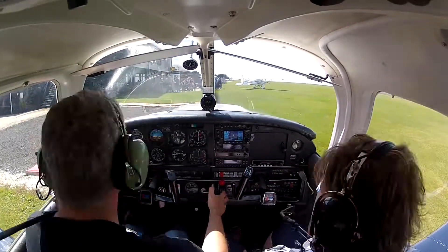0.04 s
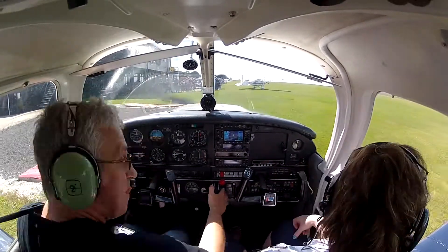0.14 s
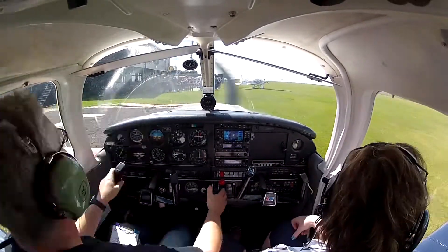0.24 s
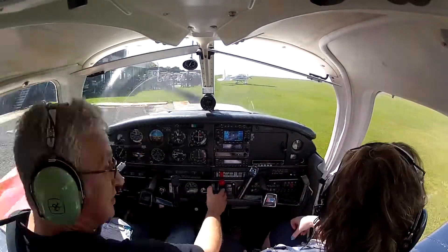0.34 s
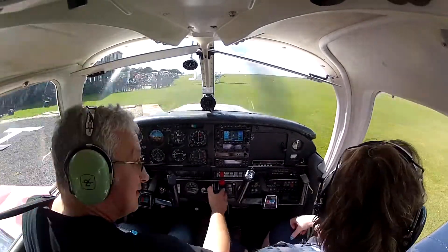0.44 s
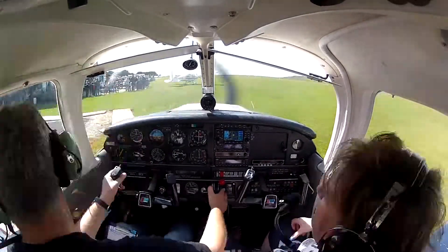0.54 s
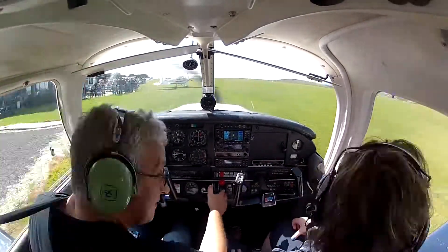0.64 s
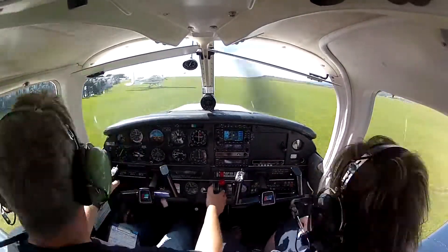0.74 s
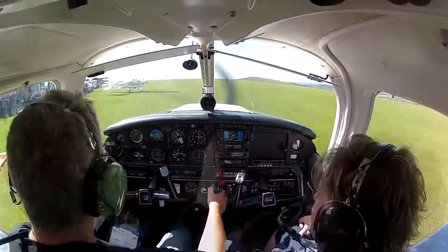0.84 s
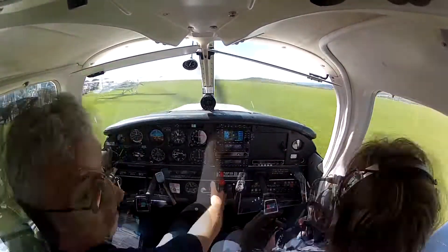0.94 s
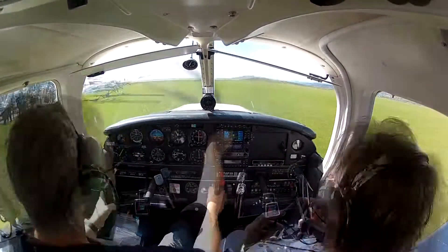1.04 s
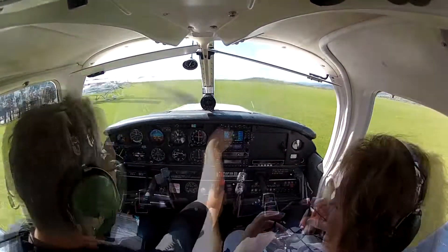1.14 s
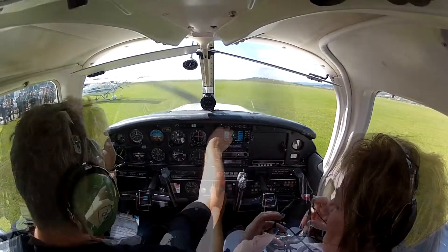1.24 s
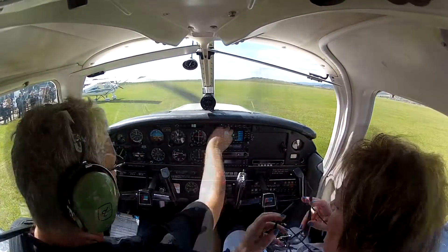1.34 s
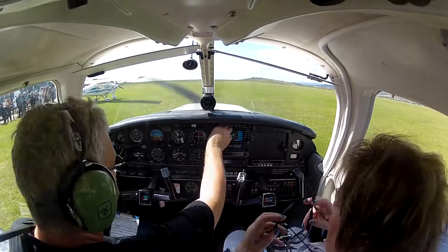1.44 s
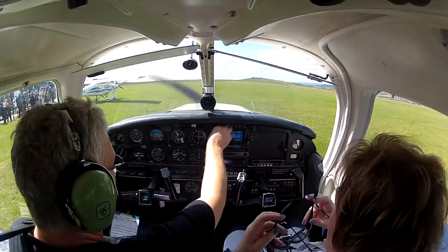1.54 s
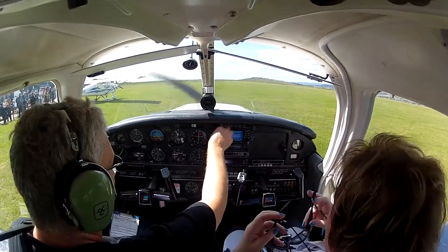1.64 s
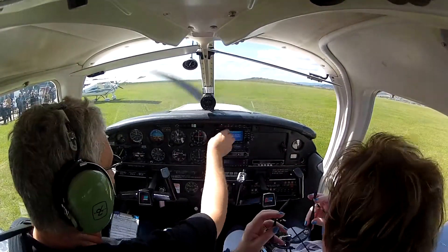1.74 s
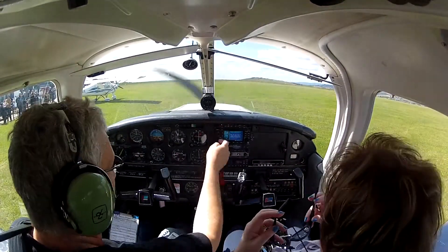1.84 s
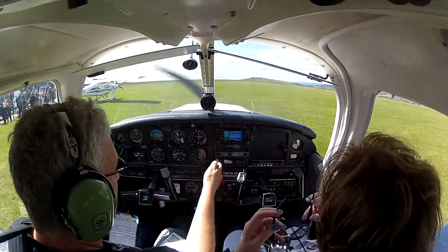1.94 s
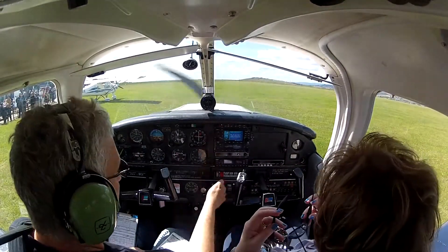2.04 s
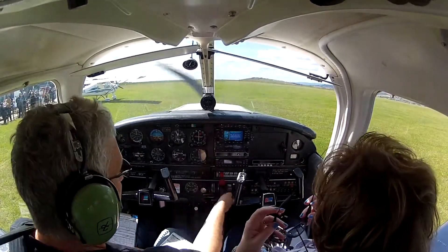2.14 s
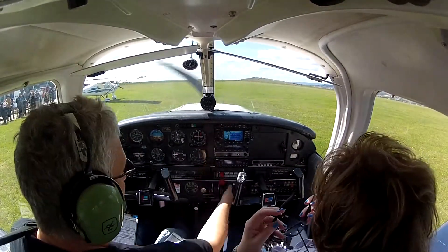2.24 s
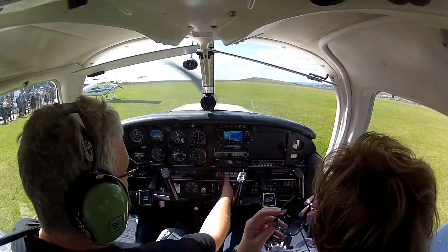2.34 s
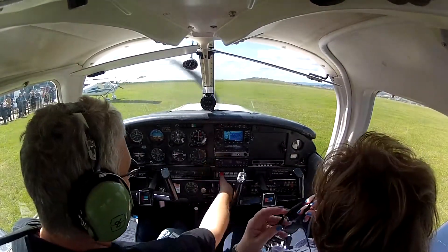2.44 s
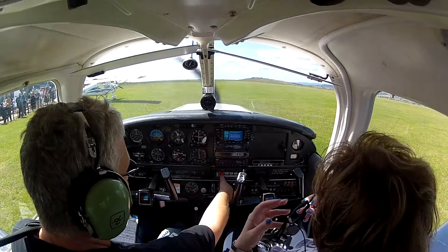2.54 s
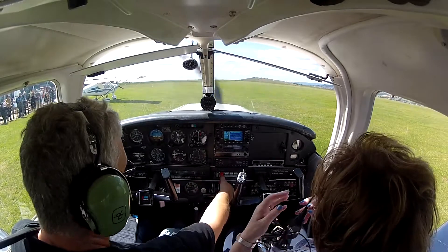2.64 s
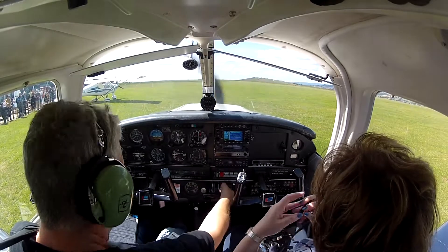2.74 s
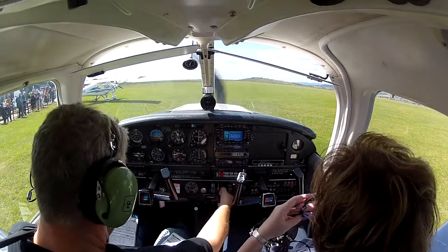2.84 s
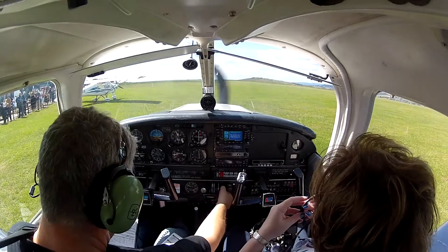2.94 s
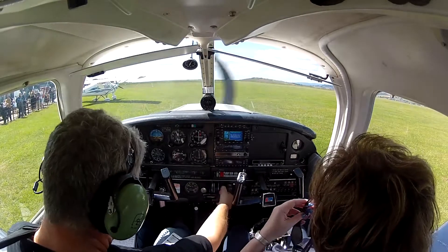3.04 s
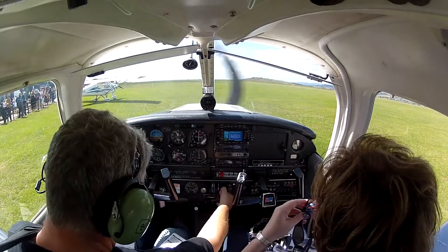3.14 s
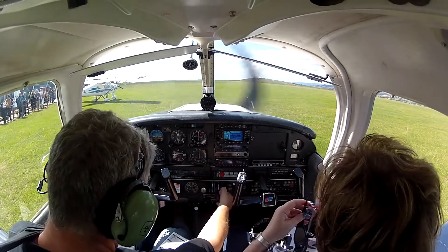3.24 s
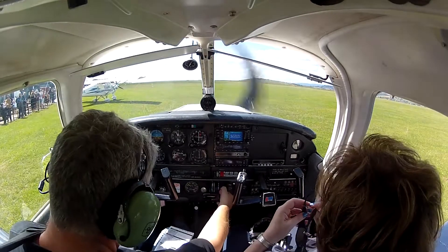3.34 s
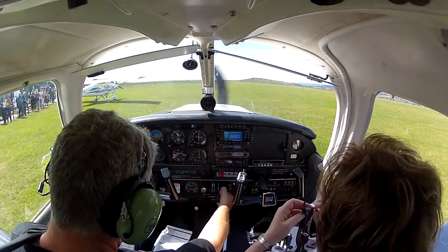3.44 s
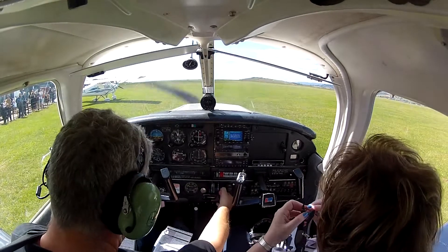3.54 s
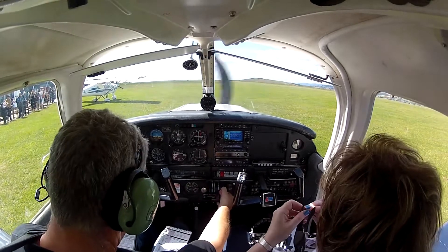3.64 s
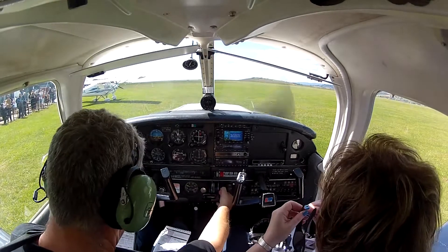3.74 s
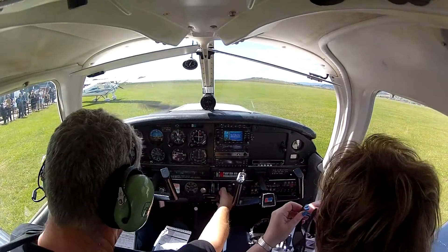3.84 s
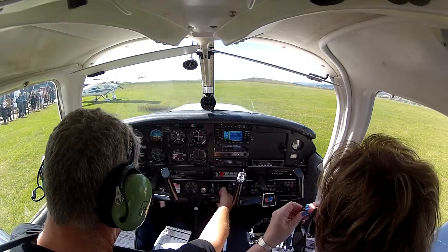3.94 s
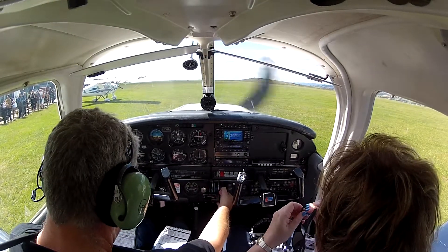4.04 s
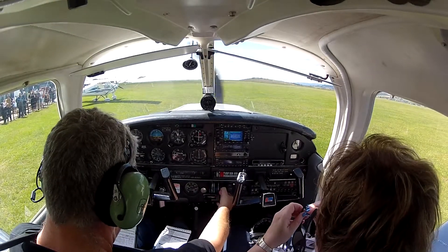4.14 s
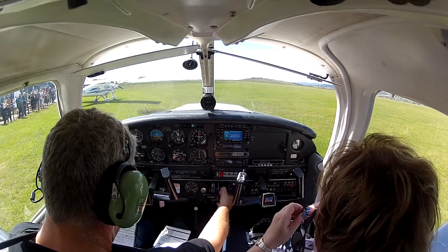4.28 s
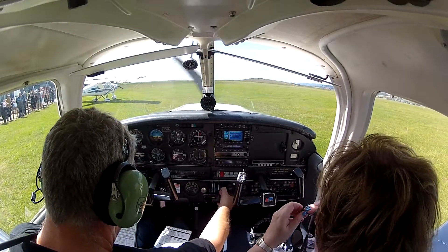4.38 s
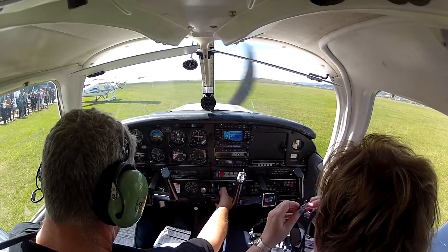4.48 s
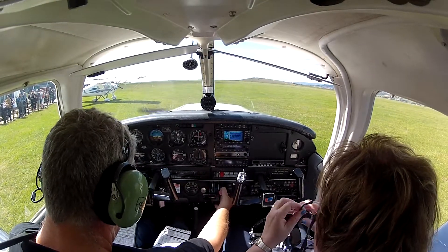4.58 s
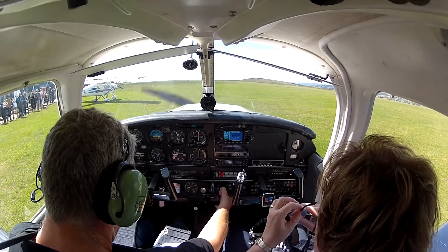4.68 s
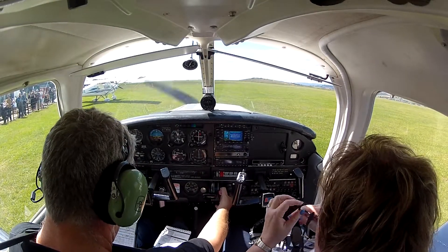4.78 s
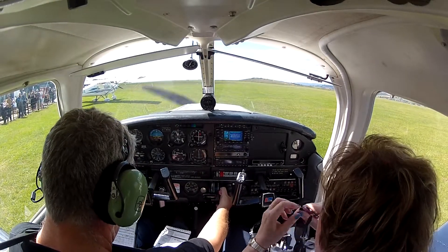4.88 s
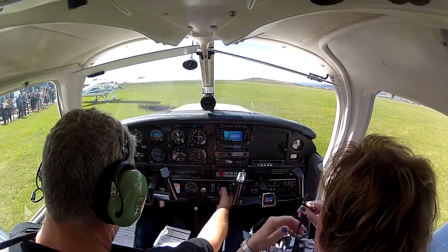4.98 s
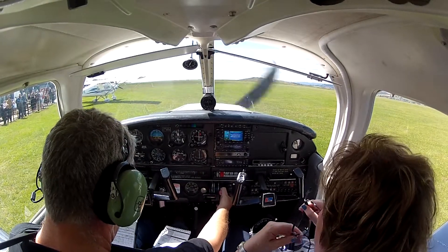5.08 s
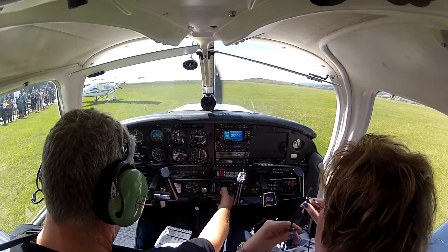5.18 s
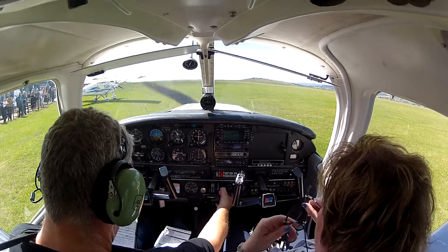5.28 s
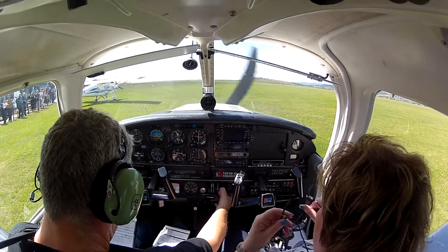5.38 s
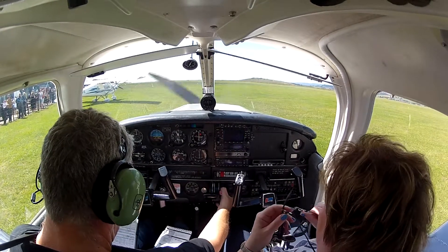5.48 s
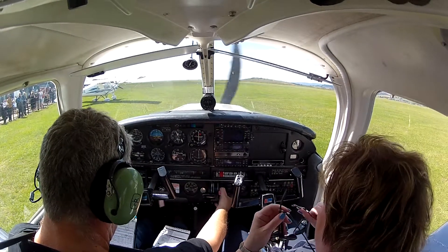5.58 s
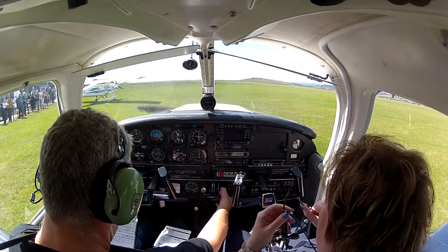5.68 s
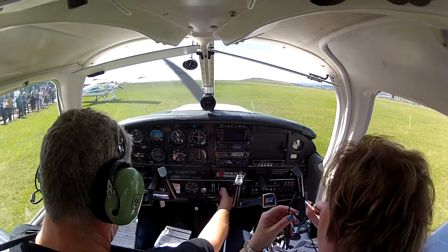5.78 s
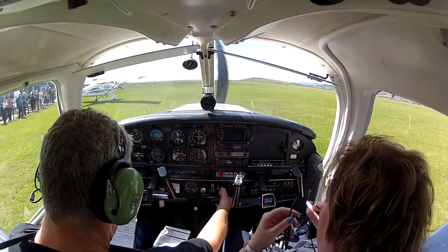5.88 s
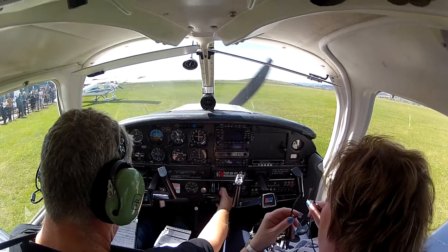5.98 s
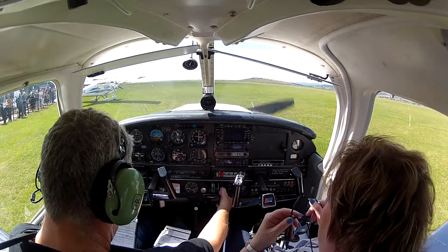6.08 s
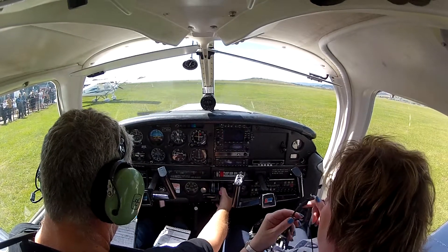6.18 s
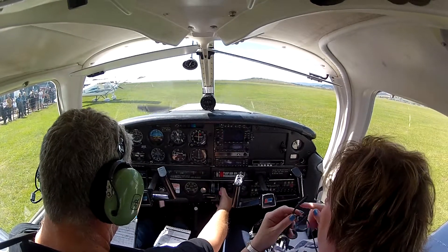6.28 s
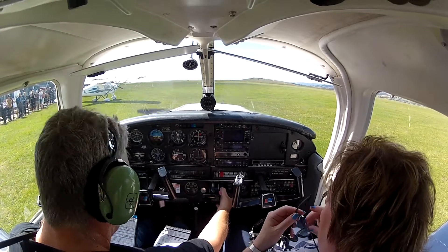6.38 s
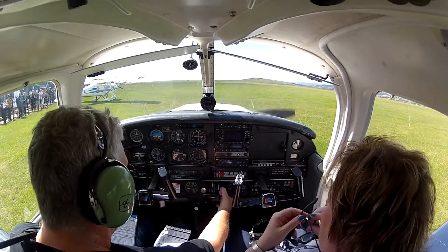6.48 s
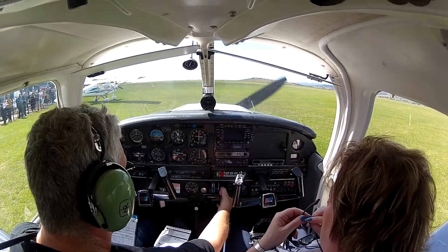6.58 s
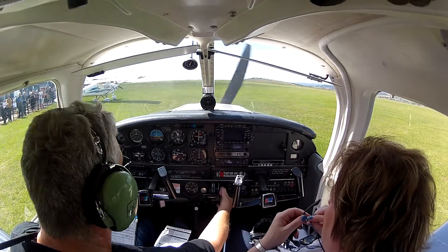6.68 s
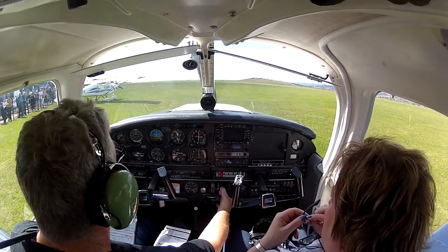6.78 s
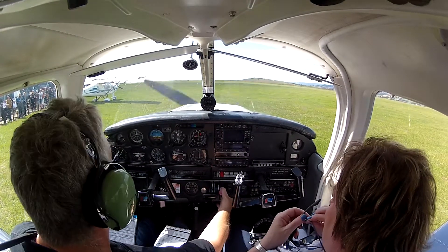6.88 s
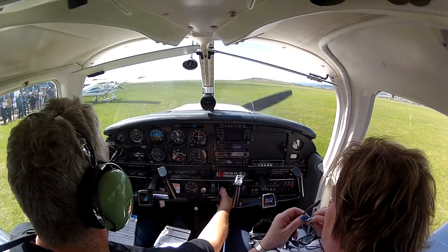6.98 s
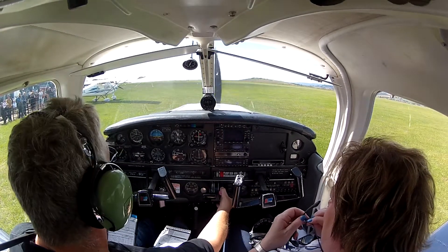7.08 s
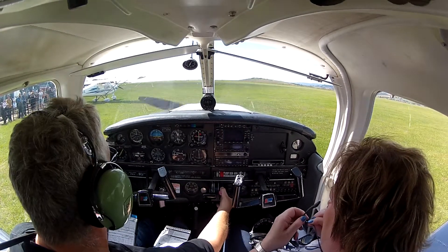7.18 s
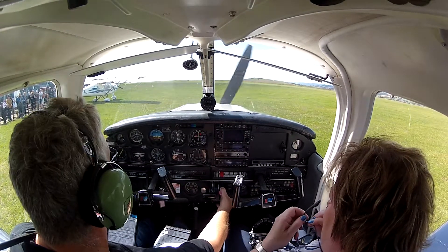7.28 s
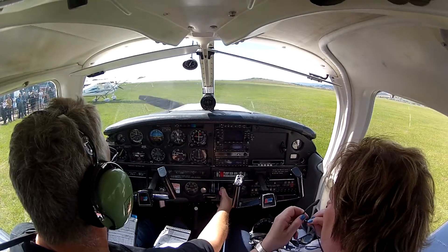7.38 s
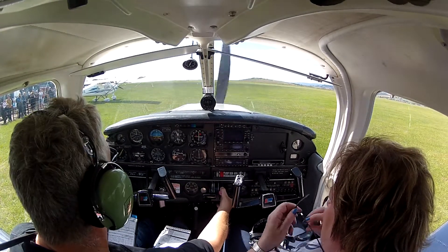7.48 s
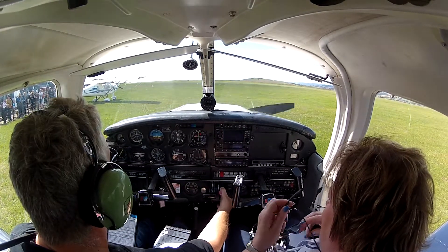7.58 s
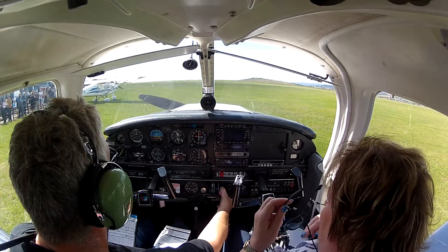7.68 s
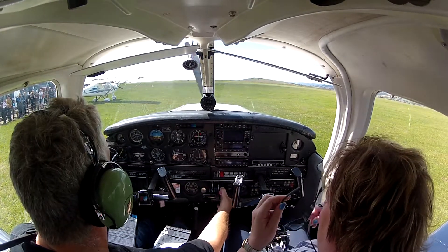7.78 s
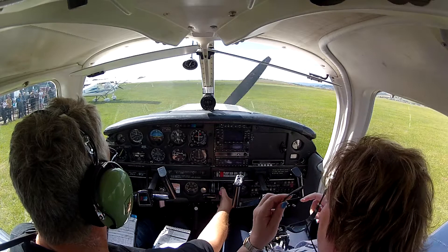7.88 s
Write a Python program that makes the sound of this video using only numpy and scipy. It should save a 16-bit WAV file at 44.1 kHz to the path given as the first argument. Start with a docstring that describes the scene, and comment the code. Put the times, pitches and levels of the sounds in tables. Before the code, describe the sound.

A small propeller plane's piston engine fades in at idle, heard close from inside the cabin as a low, throbbing drone with mechanical clatter. After a few light clicks it cuts out and winds down, falling in pitch and puffing. A shudder rattles loose cabin fittings, then the last turns come as separate, slowing clacks. A faint, high instrument whine and hiss carry on underneath.

```python
"""Light aircraft engine shutting down

Inside the cabin, on a camera's microphone. The sound fades in on a four-cylinder engine at idle, then
the fuel is cut. The engine runs down, shudders on its mounts so that the cabin rattles, and clacks
through its last compressions. The instrument gyros whine on. The camera holds each sample at a low
rate, which mirrors the sound into the treble."""
import sys
import numpy as np
from scipy import signal
from scipy.fft import rfft, irfft, next_fast_len
from scipy.io import wavfile
from scipy.ndimage import map_coordinates

SR = 44100
rng = np.random.default_rng(int(sys.argv[2]) if len(sys.argv) > 2 else 0)


def wav_out(sig):
    """Save sig, one row per channel (or a flat mono array), as 16-bit PCM at SR to the path in sys.argv[1]."""
    wavfile.write(sys.argv[1], SR, np.round(np.clip(np.atleast_2d(sig).T, -1, 1) * 32767).astype(np.int16))


N = 349139
FUEL_CUT_S = 3.37

# Relative strength of each of the four cylinders; each engine noise scales it to its own dB.
CYLINDERS = [-0.44,0.037,0.8,0.22]
# Tone of the loose fittings around the cabin. Each row: frequency in Hz, gain in dB.
FITTINGS = [(500,4),(1400,-2),(2200,5),(3000,0.5),(4000,3),(4800,4),(5600,1.5)]


def amp(db):
    """Decibels to gain."""
    return 10 ** (np.asarray(db) / 20)


def unit(x):
    """Scale to rms 1."""
    return x / np.sqrt(np.mean(x ** 2) + 1e-20)


def curve(points):
    """One value per sample along (seconds, value) points."""
    return np.interp(np.arange(N) / SR, *np.transpose(points))


def wobble(rate):
    """A smooth random curve of rms 1, with rate knots a second."""
    knots = rng.standard_normal(int(N * rate / SR) + 4)
    return unit(map_coordinates(knots, [np.arange(N) * rate / SR]))


def filtered(x, response):
    """x through a complex response, given as a function of Hz."""
    size = 2 * next_fast_len(N // 2 + SR // 4)
    return irfft(rfft(x, size) * response(np.fft.rfftfreq(size, 1 / SR)), size)[:N]


def coloured(x, points):
    """x through a minimum-phase filter with the gain of (Hz, dB) points."""
    f, db = np.transpose(points)
    def response(hz):
        gain = amp(np.interp(np.log(hz + 1), np.log(f + 1), db))
        cepstrum = irfft(np.log(gain))
        half = len(cepstrum) // 2
        cepstrum[1:half] *= 2
        cepstrum[half + 1:] = 0
        return np.exp(rfft(cepstrum))
    return filtered(x, response)


def resonance(f, hz, width):
    """Causal response of one mode."""
    return 1j * f * width / (hz * hz - f * f + 1j * f * width)


def ringing(x, modes):
    """x through (Hz, width in Hz, dB) resonances of alternating sign."""
    return filtered(x, lambda f: sum((-1) ** k * amp(db) * resonance(f, hz, width)
                                     for k, (hz, width, db) in enumerate(modes)))


def add(track, s, sound):
    """Mix a sound into a track at s seconds."""
    part = track[max(round(s * SR), 0):][:len(sound)]
    part += sound[:len(part)]


def burst(attack_s, t60_s):
    """Noise that rises and dies."""
    t = np.arange(SR // 4) / SR
    return rng.standard_normal(len(t)) * (1 - np.exp(-t / attack_s)) * np.exp(-np.log(1000) * t / t60_s)


def fade_in(rise_s, start_s=0.68):
    """Gain that opens from silence to 1."""
    age = np.maximum(np.arange(N) / SR - start_s, 0)
    return 1 - np.exp(-(age / rise_s) ** 1.78)


def firing(die_s):
    """1 while the cylinders fire, falling to 0 around the fuel cut."""
    return .5 - .5 * np.tanh((np.arange(N) / SR - FUEL_CUT_S) / die_s)


def drive(rate, coast_db, firing_db, knee_hz, steep):
    """Gain of an engine noise: shifted while firing, dying away as the stroke rate sinks below a knee."""
    return amp(coast_db + firing_db * firing(die_s=.2)) / np.sqrt(1 + (knee_hz / rate) ** steep)


def stroke_noise(crank, rise, fall, own, rough, scatter_db, uneven):
    """A swell of noise per stroke, shaped in crank angle so that it stretches as the engine slows."""
    stroke, angle = np.floor(crank).astype(int), crank % 1
    cylinder = stroke % len(CYLINDERS)
    age = np.arange(N) - np.searchsorted(stroke, stroke)
    # Part is alike for all strokes, part is each cylinder's own, the rough part is new every time.
    voices = rng.standard_normal(SR) + own * rng.standard_normal((len(CYLINDERS), SR))
    scatter = scatter_db * rng.standard_normal(stroke[-1] + 1)
    noise = voices[cylinder, age % SR] + rough * rng.standard_normal(N)
    size = amp(uneven * np.array(CYLINDERS)[cylinder] + scatter[stroke])
    swell = (1 - np.exp(-angle / rise)) * np.exp(-angle / fall)
    return unit(size * swell * noise)


def drone(crank, rate):
    """Exhaust and propeller drone: each order swells as it sweeps down through a cabin resonance."""
    # Each row: multiple of the stroke rate, coasting level in dB, change in dB while firing.
    orders = [(1, -11.5, -0.5), (2, -17.5, 6), (3, -29.5, 7.5), (4, -29, -2)]
    # The cabin's response. Each row: frequency in Hz, gain in dB.
    cabin_gain = [(10, -34.5), (14.5, -22.5), (24.5, -7.5), (30, -14.5), (37, 0), (40.5, -4.5), (44, -59),
                  (53, -17), (57.5, 9.5), (65, 4), (73, -16.5), (81, -1.5), (103, 3), (150, -7.5)]
    hz, gain_db = np.transpose(cabin_gain)
    # At idle the orders line up into one pressure dip per stroke; coasting, they drift into a sway.
    dip = crank - .23
    drift = curve([(3.3, 0), (4.5, .25)])
    burning, out = firing(die_s=0.069), np.zeros(N)
    for order, coast_db, firing_db in orders:
        cabin_db = np.interp(order * rate, hz, gain_db)
        level_db = coast_db + firing_db * burning + cabin_db + 0.17 * wobble(13)
        out -= amp(level_db) * np.cos(2 * np.pi * (order * dip - drift * (order - 1) ** 2))
    return np.sqrt(2) * out


def cabin_boom(crank, rate, shudder):
    """Uneven shoves of the engine on its mounts ring the low modes of the cabin."""
    # Air and frame modes. Each row: frequency in Hz, width in Hz, gain in dB.
    modes = [(28.4, 3, -14), (59.1, 6.5, -2.5), (103.8, 36, 1), (110.7, 56, -4)]
    starts = np.flatnonzero(np.diff(np.floor(crank)))
    shove_db = 0.37 * np.resize(CYLINDERS, len(starts)) + 2.3 * rng.standard_normal(len(starts))
    shoves = np.zeros(N)
    shoves[starts] = amp(shove_db) / np.sqrt(rate[starts])
    push = unit(shoves) + rng.standard_normal(N)
    boom = unit(filtered(ringing(push, modes), lambda hz: 1 / (1 + (hz / 190) ** 4)))
    return boom * np.hypot(shudder, drive(rate, coast_db=-18, firing_db=3, knee_hz=21.4, steep=4.4))


def panel_drumming(crank, rate, shudder):
    """Every stroke drums on the panels around the microphone."""
    # Tone of the panels. Each row: frequency in Hz, gain in dB.
    panels = [(60, -66), (115, -5), (145, 2), (185, 1.5), (215, 0), (245, -1.5), (290, -9), (350, -10),
              (430, -15.5), (700, -41.5)]
    beats = stroke_noise(crank, rise=0.079, fall=1.0, own=0.52, rough=0.94, scatter_db=1.2, uneven=0.27)
    running = drive(rate, coast_db=-27, firing_db=7.5, knee_hz=24.3, steep=2.7)
    return np.hypot(shudder, running) * unit(coloured(beats, panels))


def valve_clatter(crank, rate, shudder):
    """The valve gear taps a quarter of the way into each stroke."""
    # Tone of the valve gear. Each row: frequency in Hz, gain in dB.
    valves = [(250, -27.5), (370, -1), (480, 5), (570, 0), (640, -4), (750, -0.5), (960, -1), (1090, -0.5),
              (1220, -11), (1420, -7.5), (1700, -15.5), (2100, -15.5), (2800, -27), (5600, -33)]
    lagged = crank - .25 + len(CYLINDERS)
    taps = stroke_noise(lagged, rise=0.07, fall=1.3, own=1.3, rough=1.6, scatter_db=1.1, uneven=.4)
    clatter = unit(coloured(taps + .5 * rng.standard_normal(N), valves))
    running = drive(rate, coast_db=-30.5, firing_db=6, knee_hz=18.1, steep=3.5)
    return np.hypot(amp(-14.5) * shudder, running) * clatter


def gas_puffs(crank, rate):
    """Gas rushes through the valves; the intake hoots once a cycle, standing out as other noise drops."""
    # Each row: place in the four-stroke cycle and half length, both in strokes, pitch and width in Hz,
    # relative level in dB at idle and when coasting.
    puffs = [(2.3, .25, 470, 130, -1, -6), (2.8, .27, 1080, 45, -10, 3), (2.59, .2, 950, 350, -3, -9),
             (3.65, .22, 900, 260, 3.5, 1.5), (.5, .15, 1050, 310, -2, -4), (.35, .14, 450, 140, -5, -3)]
    coast_share = curve([(3.3, 0.23), (4.1, 0.66)])
    out = np.zeros(N)
    for stroke, half_length, hz, width, idle_db, coast_db in puffs:
        away = (crank - stroke + 2) % len(CYLINDERS) - 2
        swell = np.exp(-.5 * (away / half_length) ** 2)
        rush = unit(filtered(rng.standard_normal(N), lambda f: resonance(f, hz, width) ** 2))
        out += amp(idle_db + coast_share * (coast_db - idle_db)) * swell * rush
    return out * drive(rate, coast_db=-31.5, firing_db=5, knee_hz=11.5, steep=6)


def gyros():
    """Spinning instrument gyros: rotor hum, clean tones, wavering tones and bearing hiss."""
    # Steady whine. Each row: frequency in Hz, level in dB.
    steady_tones = [(2659, -62), (3467, -56), (3655, -55), (3752, -57), (3898, -57), (4054, -58.5),
                    (4226, -65.5), (5179, -62.5)]
    # Wavering whine. Each row: frequency in Hz, width in Hz, level in dB before the swell.
    wavering_tones = [(236.5, 34, -59.5), (1958, 45, -53), (2058, 45, -53.5), (4040, 40, -57.5)]
    # Swell of the wavering whine. Each row: time in seconds, gain in dB.
    swell = [(1, 4), (6, 2), (6.7, 5.5)]
    hum_hz, hum_db = 237, -45.5
    phase_per_hz = 2 * np.pi * np.arange(N) / SR
    tones = sum(amp(db + 0.4 * wobble(4.5)) * np.sin(hz * phase_per_hz + 1.5 * wobble(4))
                for hz, db in [(hum_hz, hum_db), *steady_tones])
    waver = np.zeros(N)
    for hz, width, db in wavering_tones:
        phase = hz * phase_per_hz
        waver += amp(db) * (wobble(width) * np.sin(phase) + wobble(width) * np.cos(phase))
    # Tone of the bearing hiss. Each row: frequency in Hz, gain in dB.
    bearings = [(25,6),(90,9.5),(200,-8),(400,-2),(1000,-7.5),(1500,-12.5),(2600,-11.5),(3800,-11.5),(4600,-9.5),(5600,-18)]
    hiss = amp(-40 + 0.87 * wobble(17)) * unit(coloured(rng.standard_normal(N), bearings))
    return np.sqrt(2) * tones + amp(curve(swell)) * waver + hiss


def shudders():
    """The engine shakes on its mounts in swells; gives the gains of boom, drumming and rattle."""
    # Each row: centre and half length in seconds, then boom, drumming and rattle levels in dB.
    shakes = [(3.4, 0.34, -20, -22, -43), (5.008, 0.12, -24, -25.5, -53), (5.423, 0.19, -23, -18.5, -26.5),
              (5.666, .06, -18.5, -30, -45), (6.72, 0.24, -27, -30.5, -44.5), (7.002, 0.079, -29, -36, -58)]
    t = np.arange(N) / SR
    power = sum(np.outer(amp(levels) ** 2, np.exp(-((t - s) / half) ** 2)) for s, half, *levels in shakes)
    return np.sqrt(power)


def rattle(rate, shudder, per_second=420, spread_db=15, decay_s=.0016):
    """Loose fittings chatter in dense tiny hits, most in the shudders."""
    hits = (rng.random(N) < per_second / SR) * amp(spread_db * rng.random(N))
    decay = np.exp(-np.arange(SR // 20) / SR / decay_s)
    energy = np.abs(signal.fftconvolve(hits ** 2, decay)[:N])
    chatter = unit(coloured(np.sqrt(energy) * rng.standard_normal(N), FITTINGS))
    return chatter * np.hypot(shudder, drive(rate, coast_db=-45.5, firing_db=-10, knee_hz=6.1, steep=5.1))


def fitting_clicks():
    """A few sharp hits ring small, loose metal fittings."""
    # Each row: start in seconds, relative level in dB.
    clicks = [(3.3604, -23), (3.384, -21), (3.4101, -21.5), (3.4607, -25), (3.4884, -24.5), (5.2997, -22),
              (5.3292, -26), (7.213, -21)]
    # Modes of a fitting. Each row: frequency in Hz, width in Hz, gain in dB.
    modes = [(2740, 240, -4.5), (4830, 420, 1.5)]
    hits = np.zeros(N)
    for s, db in clicks:
        add(hits, s, amp(db) * burst(attack_s=0.0005, t60_s=0.025))
    return amp(9.5) * ringing(hits, modes) + amp(-4) * coloured(hits, FITTINGS)


def coasting_knocks(crank, from_s=3.7, until_s=5.9):
    """(seconds, dB) of the knocks that return at the same crank angles while the engine coasts."""
    # Each row: place in the four-stroke cycle in strokes, relative level in dB.
    cycle_knocks = [(0.45, -30), (1.6, -31), (3.52, -24)]
    knocks = [(np.searchsorted(crank, cycle + stroke) / SR, db)
              for cycle in np.arange(0, crank[-1], len(CYLINDERS)) for stroke, db in cycle_knocks]
    return [(s, db) for s, db in knocks if from_s < s < until_s]


def engine_clacks(crank):
    """The slowing engine knocks and the magneto coupling snaps on the last turns: clack, then rebound."""
    # Single clacks in the big shudder and last turns. Each row: start in seconds, relative level in dB.
    clacks = [(5.129, -20), (5.429, -17), (5.552, -18.5), (5.614, -18.5), (6.037, -22), (6.171, -20),
              (6.251, -19.5), (6.416, -21), (6.531, -16), (6.544, -16.5), (6.639, -25), (6.698, -22),
              (6.774, -21.5), (6.811, -19.5), (6.909, -16), (6.956, -21), (7.005, -21), (7.107, -21),
              (7.216, -17.5), (7.413, -16.5), (7.683, -16.5)]
    # Tone of a soft blow and of a hard, brighter one. Each row: frequency in Hz, gain in dB.
    soft_tone = [(250,-42),(400,-8),(520,-9.5),(640,0),(850,-3.5),(1080,3),(1220,-17),(1450,-19),(1800,-20),(2500,-21),(3500,-37)]
    hard_tone = [(160, -28), (280, -9), (323, -17), (412, 1), (560, -4.5), (830, 0), (1230, -6.5),
                 (1370, -6.5), (2000, -15.5), (2190, -13.5), (3200, -34), (4160, -31), (7040, -120)]
    soft, hard = np.zeros(N), np.zeros(N)
    for s, db in clacks + coasting_knocks(crank):
        hardness = np.clip((db + 22.5) / 8, 0, 1)
        for track, share in ((soft, 1 - hardness), (hard, hardness)):
            add(track, s, amp(db) * np.sqrt(share) * burst(attack_s=0.0019, t60_s=0.09))
            add(track, s + .017, amp(db - 5.5) * np.sqrt(share) * burst(attack_s=0.0093, t60_s=0.11))
    body = amp(7.5) * coloured(soft, soft_tone) + amp(13.5) * coloured(hard, hard_tone)
    return body + amp(-15.5) * coloured(hard, FITTINGS)


def scene():
    """The cabin in mono: the crankshaft paces the engine; the gyros fade in a little behind it."""
    # Engine speed. Each row: time in seconds, compression strokes per second.
    speed = [(.7,40.2),(2,40.15),(3.1,40.4),(3.3,41),(3.7,32.8),(4.25,25.6),(4.7,21.1),(5.3,16.3),(6,11.8),(6.6,8.8),(7.2,5.4),(7.9,3)]
    rate = curve(speed)
    crank = np.cumsum(rate) / SR  # angle, counted in strokes
    boom_shudder, panel_shudder, rattle_shudder = shudders()
    whine = gyros()
    fittings = rattle(rate, rattle_shudder) + fitting_clicks()
    engine = drone(crank, rate) + panel_drumming(crank, rate, panel_shudder)
    engine += valve_clatter(crank, rate, panel_shudder) + cabin_boom(crank, rate, boom_shudder)
    engine += gas_puffs(crank, rate) + engine_clacks(crank)
    return (fade_in(rise_s=1.13) * (engine + fittings) + fade_in(rise_s=1.3) * whine)[None]


def record(dry):
    """The camera keeps a narrow band and mirrors it around its sample-hold rate."""
    band_hz, hold_hz, top_hz = 5600, 12000, 15400
    band = filtered(dry[0], lambda hz: 1 / np.sqrt(1 + (hz / band_hz) ** 44))
    mirror = band * 2 * np.cos(2 * np.pi * hold_hz * np.arange(N) / SR)
    held = band + filtered(mirror, lambda hz: (hz - hold_hz) / np.maximum(hz, hold_hz / 2))
    limited = held / (1 + held ** 8) ** (1 / 8)  # a soft limiter keeps the output from clipping
    return filtered(limited, lambda hz: hz < top_hz)[None]


dry = scene()
out = record(dry)
wav_out(out)
```